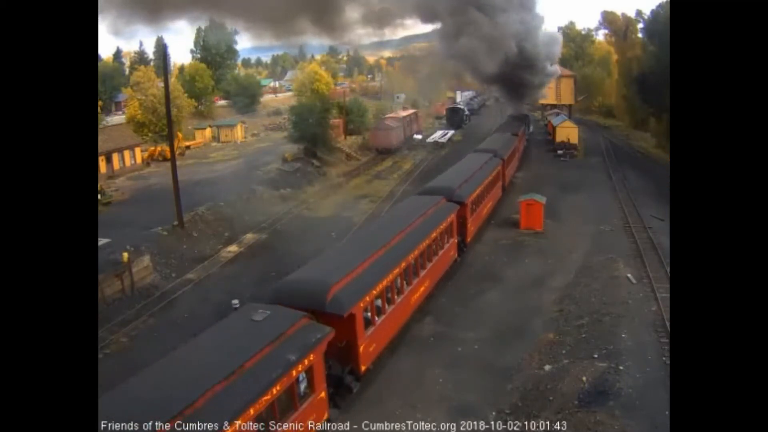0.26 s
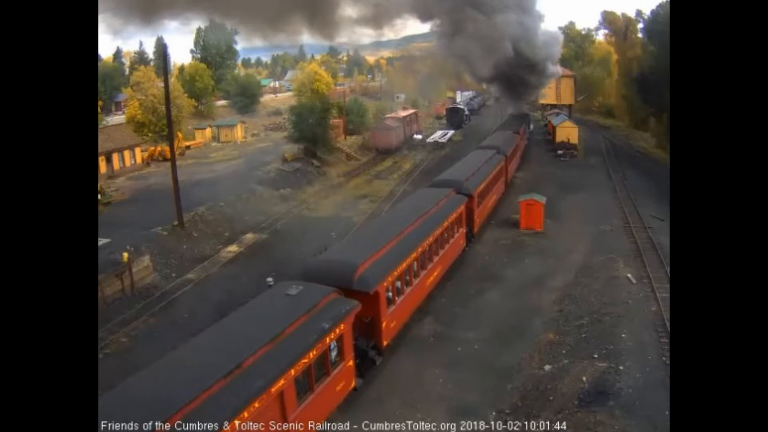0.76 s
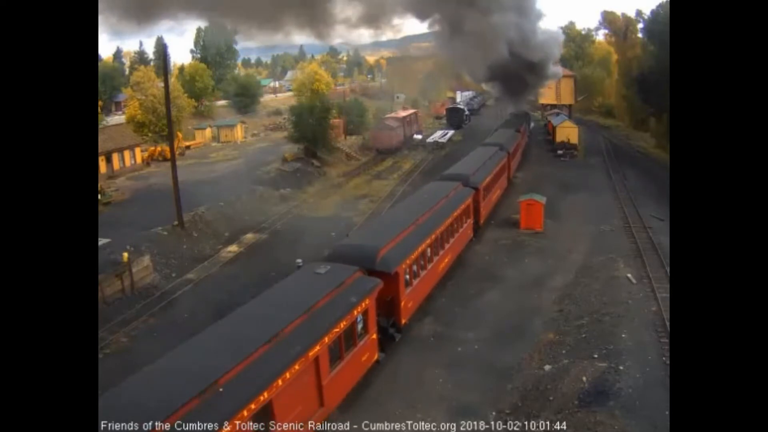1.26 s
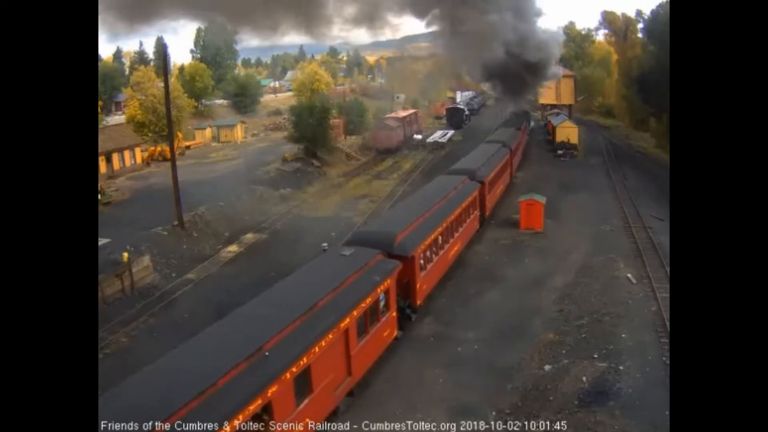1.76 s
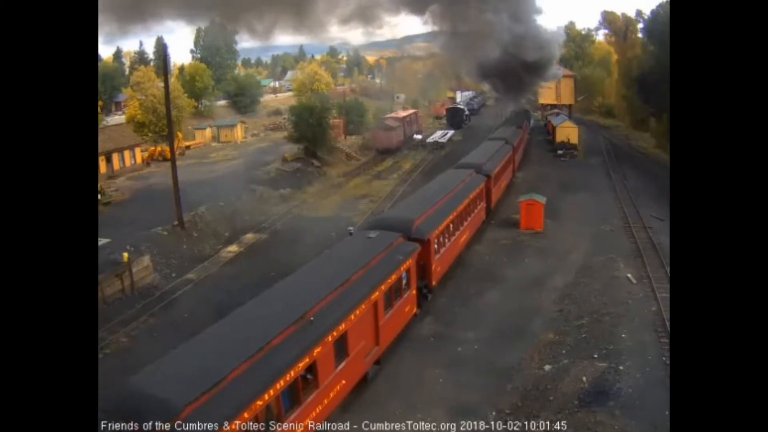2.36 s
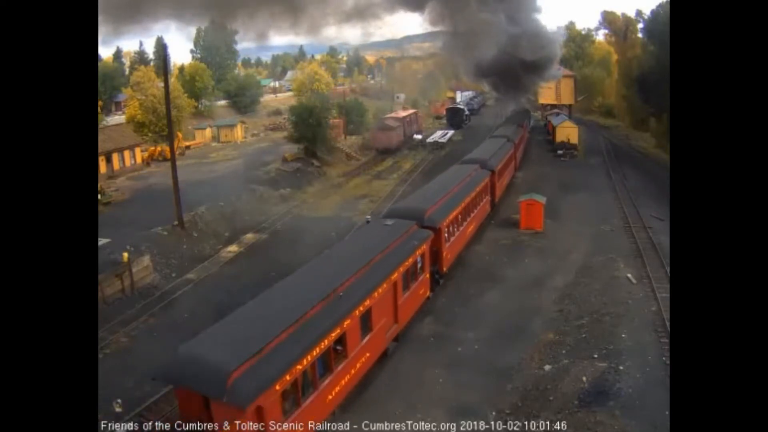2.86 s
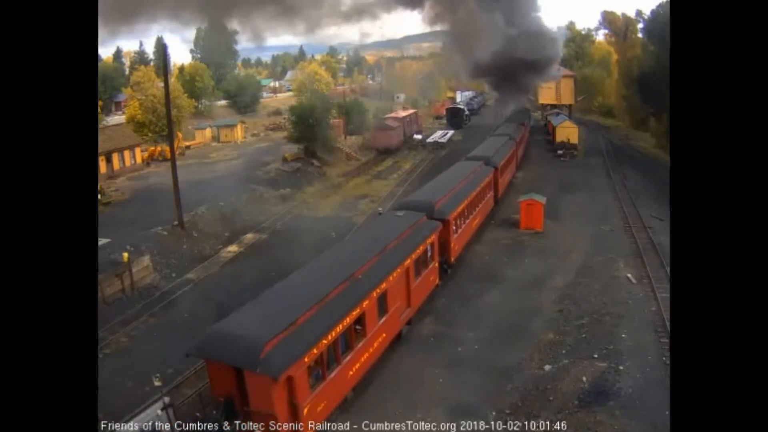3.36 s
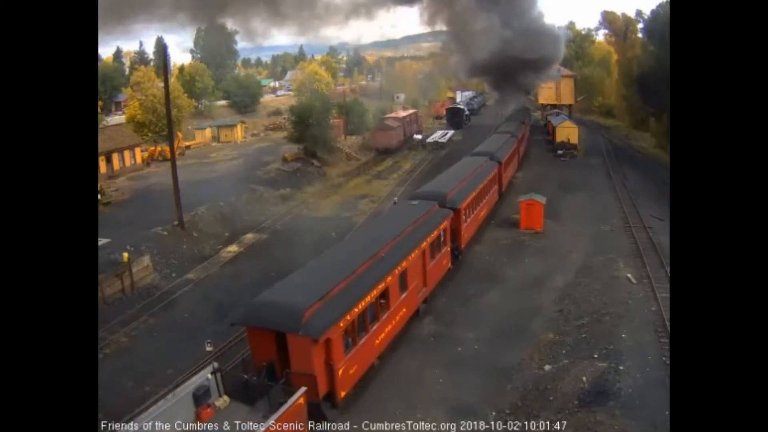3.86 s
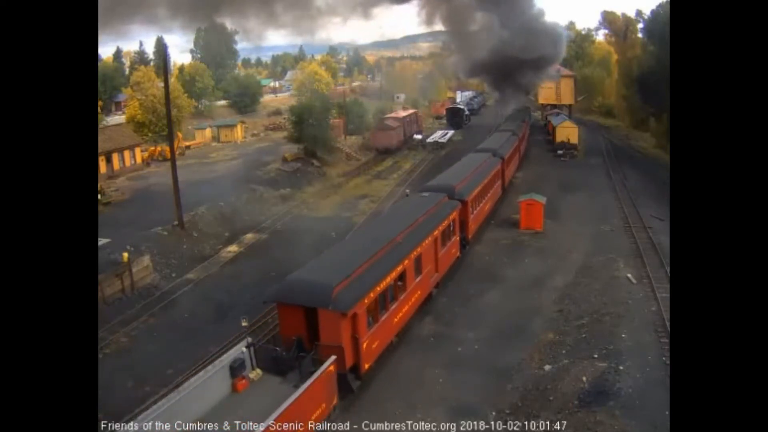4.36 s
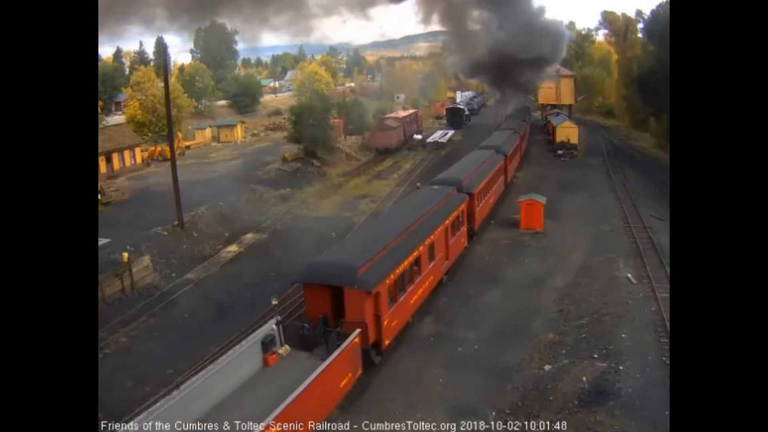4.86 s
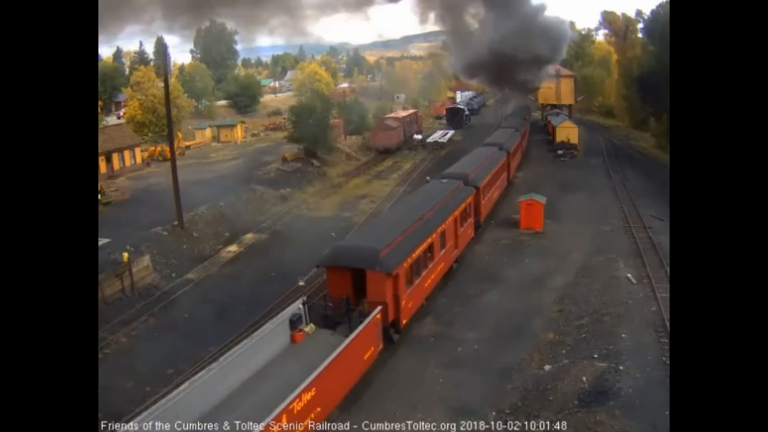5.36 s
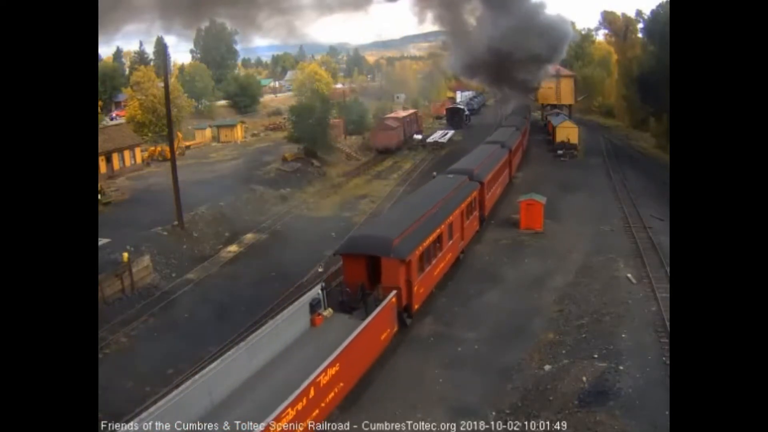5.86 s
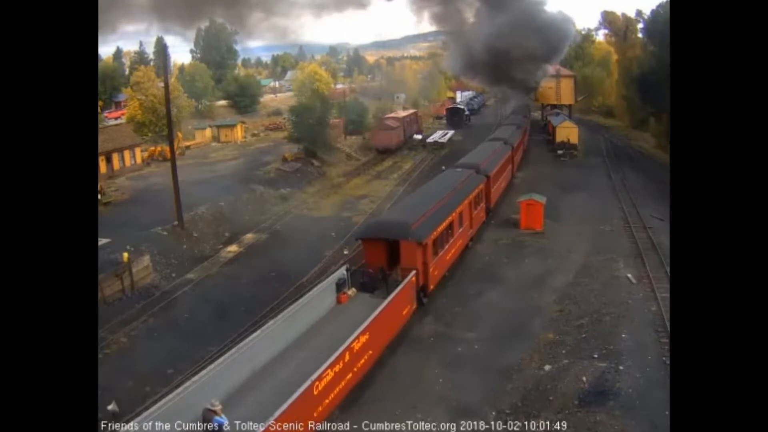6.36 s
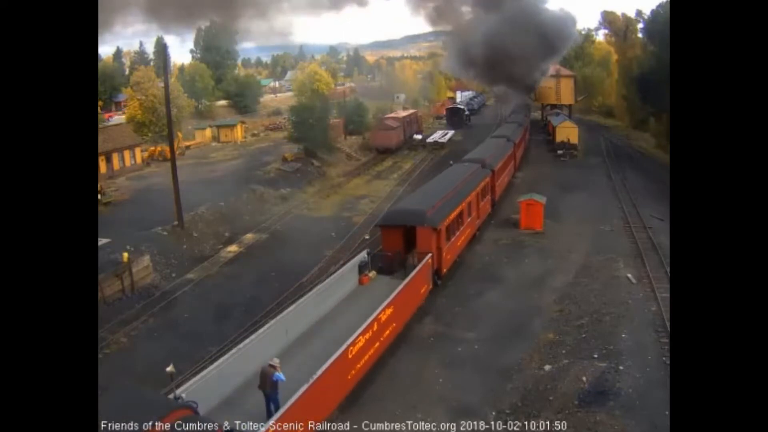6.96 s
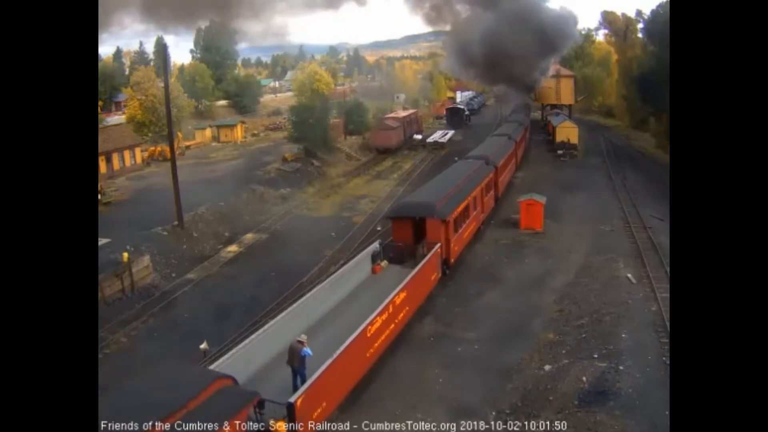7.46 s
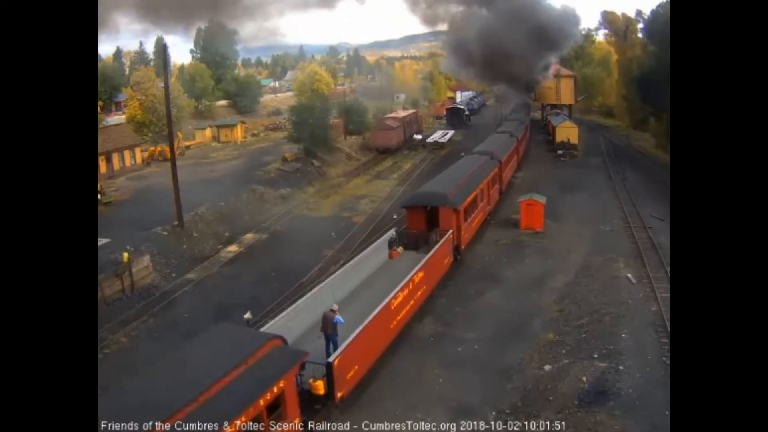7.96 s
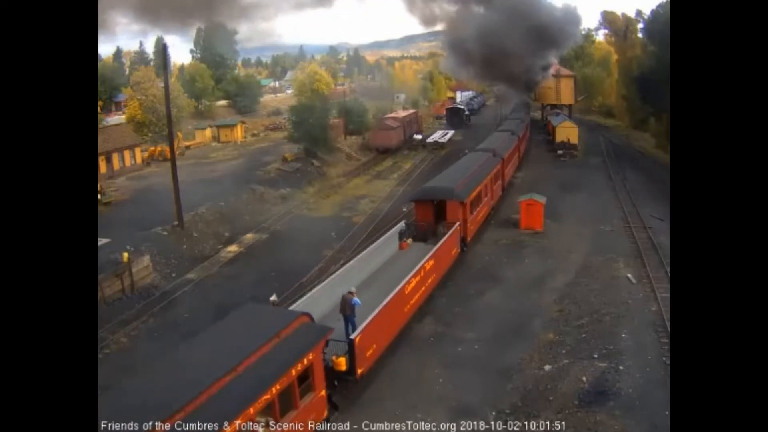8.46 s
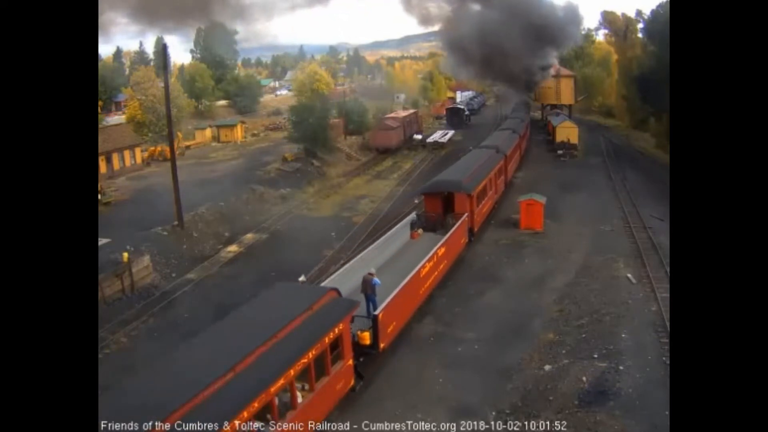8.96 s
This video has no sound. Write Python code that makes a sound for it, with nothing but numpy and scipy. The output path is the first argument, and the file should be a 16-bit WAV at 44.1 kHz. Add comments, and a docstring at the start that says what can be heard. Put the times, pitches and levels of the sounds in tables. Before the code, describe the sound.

A departing steam train toots its rich, airy whistle twice in the distance, and the sound rings away across an open yard. A soft, steady hiss continues close to the microphone beside the track, along with the low-key rolling of passenger coaches and a thin whine. From about halfway, a small metal part ticks rapidly while wheels knock unevenly over rail joints, and the flanges squeak briefly toward the end.

```python
"""A steam locomotive's five-chime whistle, two short blasts from far down a rail yard as the train leaves.
Steam blows five pipes, each sounding mostly odd harmonics in a breathy rush; buildings and wooded
slopes throw the blasts back. Nearer the microphone the coaches roll past, wheels clunking and flanges
squeaking, under a steady hiss, with a quick, light metallic ticking and a faint motor whine."""
import sys
import numpy as np
from scipy import signal
from scipy.fft import rfft, irfft, next_fast_len
from scipy.io import wavfile
from scipy.ndimage import uniform_filter1d, map_coordinates

SR = 44100
rng = np.random.default_rng(int(sys.argv[2]) if len(sys.argv) > 2 else 0)


def master_out(mix):
    """Clip the mix to full scale and print it as 16-bit PCM to the path in sys.argv[1]."""
    frames = np.transpose(np.atleast_2d(mix))
    ceiling = np.clip(frames, -1, 1)
    pcm = np.round(ceiling * 32767).astype(np.int16)
    wavfile.write(sys.argv[1], SR, pcm)


N = 405719
TIME = np.arange(N) / SR


def undb(db):
    """Decibels to gain."""
    return 10 ** (np.asarray(db) / 20)


def curve(rows):
    """Join (time [s], value) points with straight lines."""
    return np.interp(TIME, *np.transpose(rows))


def bump(t, centre_s, half_s):
    """A bell curve of height 1."""
    return np.exp(-((t - centre_s) / half_s) ** 2)


def decay(t, t60_s):
    """A fall of 60 dB every t60_s."""
    return np.exp(-np.log(1000) * t / t60_s)


def walk(rate_hz):
    """Smooth random drift with a spread near 1, changing rate_hz times a second."""
    steps = rng.standard_normal(8192)
    return map_coordinates(steps, [TIME[::32] * rate_hz], order=3, mode="wrap").repeat(32)[:N]


def noise(spectrum):
    """Noise of rms 1, shaped by (frequency [Hz], level [dB]) points and rolled off above them."""
    hz, db = np.transpose(spectrum)
    size = next_fast_len(N, real=True)
    bins = np.maximum(np.fft.rfftfreq(size, 1 / SR), 1)
    gain = undb(np.interp(np.log(bins), np.log(hz), db)) / (1 + (bins / (2 * hz[-1])) ** 4)
    shaped = irfft(rfft(rng.standard_normal(size)) * gain, size)[:N]
    return shaped / np.sqrt(np.mean(shaped ** 2))


def lowpass(x, hz):
    """Gentle first-order low-pass."""
    return signal.sosfilt(signal.butter(1, hz, fs=SR, output="sos"), x)


def phase_of(hz):
    """Running phase of a moving frequency."""
    return 2 * np.pi * np.cumsum(hz) / SR


# Low rumble all over the yard: (frequency [Hz], relative level [dB])
RUMBLE_SPECTRUM = [(15, -14), (28, -4), (42, 5), (52, -1), (68, -1.5), (85, -12), (102, -17), (120, -6.5),
                   (175, -2.5), (280, -2), (400, -6), (700, -17.5), (1500, -42.5)]
def yard_rumble(level_db=-68, drift_db=0.52):
    """The yard's low rumble drifts slowly in level behind everything else."""
    return noise(RUMBLE_SPECTRUM) * undb(level_db + drift_db * walk(2.5))


# Motor whine, faint at the microphone: (frequency [Hz], rms level [dB])
WHINE_LINES = [(2445, -64), (2472, -68), (4195.5, -79), (4253, -82.5), (4312.5, -79), (5098, -94)]
def motor_whine(flutter_db=3.0):
    """A small motor sings thin, fluttering lines that waver together with its speed."""
    speed = 1 + .0005 * walk(20)
    return sum(np.sqrt(2) * undb(db + flutter_db * walk(14)) * np.sin(phase_of(hz * speed))
               for hz, db in WHINE_LINES)


# Steam hissing nearby: (frequency [Hz], relative level [dB])
HISS_SPECTRUM = [(1200, -29), (2000, -11), (2300, -5.5), (2450, -1.5), (2650, -1.5), (2800, -3), (3200, -5),
                 (3380, -4), (3800, -11), (4100, -18.5), (4450, -25), (4850, -29), (5250, -34.5),
                 (7000, -42.5)]
# Its slow rise and fall: (time [s], level before gain_db [dB])
HISS_CONTOUR = [(0, -52), (1.3, -50), (3.5, -52.5), (6.4, -51.5), (8.7, -50), (9.2, -52.5)]
# Its brief surges: (time [s], half length [s], rise [dB])
HISS_SURGES = [(2.45, 0.056, 4), (2.99, 0.11, 2.5), (5.14, 0.14, 3), (8.358, 0.1, 2.5)]
def steam_hiss(gain_db=-1, flicker_db=1.34):
    """Steam hisses steadily, flickering a little and surging now and then."""
    surge_db = sum(db * bump(TIME, s, half_s) for s, half_s, db in HISS_SURGES)
    return noise(HISS_SPECTRUM) * undb(curve(HISS_CONTOUR) + gain_db + surge_db + flicker_db * walk(70))


# Coaches rolling on the near track: (frequency [Hz], relative level [dB])
ROLL_SPECTRUM = [(300, -26), (450, -8), (580, -13), (740, -3.5), (850, -7), (950, -3.5), (1500, -0.5),
                 (1900, -3), (2600, -5.5), (4000, -37)]
# Their passage by the microphone: (time [s], level [dB])
ROLL_CONTOUR = [(0, -58.5), (2.5, -57), (3.5, -61), (6.1, -60.5), (7.2, -59), (9.2, -59.5)]
# Wheels grinding on the rails: (time [s], half length [s], rise [dB])
WHEEL_GRINDS = [(3.84, 0.1, 1.5), (5.15, .12, 1.5), (7.96, 0.06, 3)]
def rolling_coaches(uneven_db=0.5, flicker_db=1.0):
    """Wheels roll slowly and unevenly on the rails, grinding now and then."""
    grind_db = sum(db * bump(TIME, s, half_s) for s, half_s, db in WHEEL_GRINDS)
    wheels = noise(ROLL_SPECTRUM)
    return wheels * undb(curve(ROLL_CONTOUR) + grind_db + uneven_db * walk(8.9) + flicker_db * walk(30))


# Knocks from under the passing coaches: (time [s], level [dB])
CLUNK_HITS = [(2.905, -59), (3.775, -57), (3.908, -62), (4.238, -51), (5.032, -56.5), (5.198, -54.5),
              (5.456, -53), (5.645, -53.5), (7.103, -58), (7.572, -57.5), (7.635, -67), (7.897, -51),
              (7.972, -52), (8.342, -55), (9.16, -55)]
# What a knock rings with: (frequency [Hz], relative level [dB])
CLUNK_SPECTRUM = [(400, -26.5), (650, -12.5), (780, -5.5), (940, -0.5), (1200, -6), (1510, -2.5),
                  (2050, 1.5), (2600, -9.5), (4000, -33)]
def wheel_clunks(attack_s=0.0096, t60_s=.2):
    """Wheels drop over rail joints and the running gear knocks: short, dull clatters."""
    force = np.zeros(N)
    for s, db in CLUNK_HITS:
        since = np.maximum(TIME - s, 0)
        rise = 1 - np.exp(-since / attack_s)
        force += undb(db) * rise * decay(np.maximum(since - 2 * attack_s, 0), t60_s)
    return noise(CLUNK_SPECTRUM) * force


# Squeaks from the near track: (time [s], half length [s], frequency [Hz], rms level at the peak [dB])
FLANGE_SQUEAKS = [(6.817, 0.018, 1940, -58), (7.59, 0.055, 5000, -81), (8.048, .03, 3900, -66),
                  (8.14, 0.028, 5100, -81), (8.341, 0.013, 6220, -78), (8.344, .03, 3980, -64),
                  (8.585, 0.058, 1820, -59), (8.69, .055, 1827, -64), (8.774, .03, 3930, -62.5)]
def flange_squeaks(waver=0.003, stutter_db=2):
    """A wheel rings faintly and brokenly where its flange rubs the rail."""
    grip = undb(stutter_db * walk(60))
    squeaks = np.zeros(N)
    for s, half_s, hz, db in FLANGE_SQUEAKS:
        tone = np.sqrt(2) * np.sin(phase_of(hz * (1 + waver * walk(90))))
        squeaks += undb(db) * bump(TIME, s, half_s) * tone
    return grip * squeaks


# Speed of the ticking mechanism: (time [s], rate [turns/s])
TURN_RATE = [(4.4, 8.28), (5.24, 9.39), (6.15, 8.86), (6.48, 7.97), (7.65, 8.62), (8.63, 8.7), (9.2, 8.33)]
# Its light strokes as it nears the microphone: (time [s], attack level [dB])
STROKE_CONTOUR = [(0, -56.5), (3.8, -58.5), (4.4, -52), (6.2, -49), (9.2, -51.5)]
def light_strokes(on_beat_s=4.417, back_db=-3):
    """A stroke on each turn and a weaker one half a turn later, as (time [s], level [dB])."""
    turns = np.cumsum(curve(TURN_RATE)) / SR
    turns -= np.interp(on_beat_s, TIME, turns)
    half_turns = np.arange(np.ceil(2 * turns[0]), 2 * turns[-1])
    times = np.interp(half_turns / 2, turns, TIME)
    levels = np.interp(times, TIME, curve(STROKE_CONTOUR)) + back_db * (half_turns % 2)
    return zip(times, levels)


# The metal's ring: (frequency [Hz], relative level approaching [dB], relative level near [dB], t60 [s])
METAL_MODES = [(1636, -8.5, -3, 0.048), (2448, 8, 4, .034), (2624, 8.5, 5.5, 0.03), (2930, -1, 4, 0.028),
               (3130, -4.5, -1.5, 0.03), (3344, -2.5, 6, 0.034), (3487, 2, -0.5, 0.026),
               (4003, -1.5, -6, 0.033), (4210, -6.5, -7, 0.03), (4740, -15.5, -11.5, 0.03),
               (6210, -8.5, -6.5, 0.038)]
# Hard taps on it, heard from the trackside: (time [s], attack level [dB])
HARD_TAPS = [(.281, -51), (2.635, -52), (2.998, -47), (4.012, -44.5), (4.415, -46.5), (4.655, -43.5),
             (4.879, -47.5), (4.991, -47), (5.041, -46), (5.102, -50), (5.317, -46), (5.425, -46.5),
             (5.533, -47.5), (5.751, -47), (5.860, -44), (5.971, -49), (6.084, -47.5), (6.197, -45.5),
             (6.313, -46), (6.434, -44.5), (6.929, -47), (6.983, -46), (7.097, -48), (7.170, -47.5),
             (7.231, -47.5), (7.288, -50), (7.407, -47), (7.524, -48.5), (7.640, -45), (7.757, -44.5),
             (7.873, -47), (7.989, -43.5), (8.103, -48.5), (8.218, -43.5), (8.279, -46.5), (8.340, -46.5),
             (8.449, -45.5), (8.681, -46), (8.797, -41.5), (8.913, -44.5), (9.088, -50.5), (9.151, -46.5)]
def metal_ticking(rattle_s=0.001295, band_hz=(1600, 4100), bright_db=3, bright_hz=3800,
                  nearing_s=(6.2, 6.8)):
    """A small metal part is tapped in a quick beat; its middle modes come forward as it nears."""
    t = TIME[:SR // 10]
    # neighbouring modes swing in opposite directions
    modes = [(-1) ** k * decay(t, t60) * np.sin(2 * np.pi * hz * t)
             for k, (hz, _, _, t60) in enumerate(METAL_MODES)]
    # a small part radiates no bass, and a blunt contact puts little into the high treble
    modes = signal.sosfilt(signal.butter(4, band_hz, "band", fs=SR, output="sos"), modes)
    hard = [(s, db, 0) for s, db in HARD_TAPS]
    # between the hard taps, light strokes only graze the metal and favour its high modes
    light = [(s, db, bright_db) for s, db in light_strokes()
             if all(abs(s - hard_s) > .03 for hard_s, _ in HARD_TAPS)]
    ticks = np.zeros(N + SR)
    for s, db, lift_db in hard + light:
        mode_db = [np.interp(s, nearing_s, (far_db, near_db)) + lift_db * (hz > bright_hz)
                   for hz, far_db, near_db, _ in METAL_MODES]
        # each contact is a short chatter that swells and dies away
        contact = rng.standard_normal(len(t)) * t * np.exp(-t / rattle_s)
        tap = signal.fftconvolve(contact, undb(mode_db) @ modes)[:len(t)]
        attack_rms = np.std(tap[t < .006])
        start = max(int((s - rattle_s) * SR), 0)
        ticks[start:start + len(t)] += undb(db) * tap / attack_rms
    return ticks[:N]


def moving_air(x, wander_s=.00014):
    """Moving air keeps changing a long path's length: high partials blur while low ones stay clear."""
    lag = wander_s * uniform_filter1d(walk(48), size=64)
    return map_coordinates(x, [(TIME - lag) * SR], order=3, mode="nearest")


# Echoes off the buildings round the yard: (delay [s], level before air and ground losses [dB])
BUILDING_ECHOES = [(0.089, -4), (.21, -6), (.42, -14.5), (.73, -24)]
def yard_echoes(x, trees_db=-6, trees_t60_s=2.4, smear_s=0.05, air_hz=5500, ground_hz=230,
                valley_db=-6.5, valley_t60_s=3.6, valley_hz=700, valley_width_hz=300):
    """Scatter from the trees, smeared echoes off buildings and a long, dull tail from the valley."""
    t = TIME[:3 * SR]
    scatter = decay(t, trees_t60_s) * (1 - np.exp(-t / 0.021))
    power = undb(2 * trees_db) * scatter ** 2 / np.sum(scatter ** 2)
    for delay_s, db in BUILDING_ECHOES:
        echo = bump(t, delay_s, smear_s)
        power += undb(2 * db) * echo / echo.sum()
    near = lowpass(np.sqrt(power) * rng.standard_normal(len(t)), air_hz)
    tail = decay(t, valley_t60_s) * (1 - np.exp(-t / 0.27))
    # ground takes the lows and air the highs, so a middle band carries farthest
    carry = signal.iirpeak(valley_hz, valley_hz / valley_width_hz, fs=SR)
    far = signal.lfilter(*carry, tail / np.linalg.norm(tail) * rng.standard_normal(len(t)))
    response = near + undb(valley_db) * far
    # soft ground weakens the lowest chimes on the long paths
    response -= lowpass(response, ground_hz)
    return signal.fftconvolve(moving_air(x), response)[:N]


# Blasts far down the yard: (valve opens [s], valve shuts [s], final blowing level [dB], tuning [ratio])
WHISTLE_BLASTS = [(.525, .772, -34, .987), (1.455, 1.767, -31, 1.002)]
def steam_valve(attack_s=0.037, swell_db_per_s=9.5, release_s=0.0473, settle_s=.06, sag_s=0.03584):
    """Pressure builds, creeps up while the valve is open and drains away once it shuts."""
    levels, tunings = [], []
    slack = 1  # 1 idle, 0 settled: the pipes take a moment to come up to pitch, and sag at the end
    for opens, shuts, db, tuning in WHISTLE_BLASTS:
        since_open, since_shut = np.maximum(TIME - opens, 0), np.maximum(TIME - shuts, 0)
        pressure = (1 - np.exp(-since_open / attack_s)) * np.exp(-since_shut / release_s)
        swell_db = swell_db_per_s * np.minimum(TIME - shuts, 0)
        levels.append(db + 20 * np.log10(pressure + 1e-4) + swell_db)
        tunings.append(tuning)
        slack -= (1 - bump(since_open, 0, settle_s)) * np.exp(-since_shut / sag_s)
    return np.max(levels, axis=0), np.choose(np.argmax(levels, axis=0), tunings), slack


# Steam at the distant whistle's mouth: (frequency [Hz], relative level [dB])
RUSH_SPECTRUM = [(250, -46), (350, -20), (620, -15), (745, -11.5), (850, -29.5), (1030, -12), (1112, -4.5),
                 (1160, -16), (1370, -4.5), (1490, -10.5), (1690, -8.5), (1900, -12), (2370, -1.5),
                 (3050, -4), (3650, -8.5), (4200, -21.5), (5000, -32), (7000, -47.5)]
def steam_rush(blow_db, slack, gain_db=-3.0, slack_db=-6, flicker_db=1.5):
    """Steam rushes past the lips, coloured by the pipes and weaker until they settle."""
    return noise(RUSH_SPECTRUM) * undb(blow_db + gain_db + slack_db * slack + flicker_db * walk(40))


# The five pipes, heard across the yard: (pitch [Hz], share of the tuning followed [ratio],
# flatness when idle [ratio], extra loss below full pressure [dB/dB],
# further loss per harmonic step [dB/dB], then relative levels of harmonics 1 to 6 [dB])
WHISTLE_PIPES = [(365.3, .8, .025, .4, .05, -4, -28.5, -18.5, -29, -11.5, -8.5),
                 (439.3, .15, .025, 0.01, 0.43, -7, -21.5, 0, -19.5, -0.5, -5),
                 (547.7, .5, .06, 0, 0.087, -6.5, -11.5, 1.5, -4, -7, -10.5),
                 (599.2, 1, .015, .1, .05, -6.5, -18.5, -0.5, -3, -2.5, -12.5),
                 (701, 2.0, .02, 1.4, .05, -1, -6, -12, -8, -15, -27.5)]
def whistle_chord(blow_db, tuning, slack, gain_db=-10, breath_db=-15.0, waver=0.00402, ragged=0.01407):
    """Five pipes scoop up to pitch and brighten as the pressure builds; turbulence roughens them."""
    force = undb(blow_db - blow_db.max())
    chord = np.zeros(N)
    for hz, follow, scoop, reluctance, overblow, *levels in WHISTLE_PIPES:
        # the pitch wavers, and turns ragged while the valve opens and shuts
        unsteady = 1 + waver * walk(22) + (.0035 + ragged * slack) * walk(160)
        phase = phase_of(hz * tuning ** follow * (1 - scoop * slack) * unsteady)
        for k, db in enumerate(levels):
            # the jet's turbulence spreads a noisy skirt around each line
            flutter = 1 + undb(breath_db) * walk(60 * np.sqrt(k + 1))
            chord += undb(db) * force ** (reluctance + overblow * k) * flutter * np.sin((k + 1) * phase)
    return undb(blow_db + gain_db) * chord


def scene(chord_echo_db=-2.5):
    """One microphone at the trackside: the whistle far across the yard, the coaches nearer by."""
    blow_db, tuning, slack = steam_valve()
    chord = whistle_chord(blow_db, tuning, slack)
    rush = steam_rush(blow_db, slack)
    # the echoes are breathier than the blast: they carry less of the chord than of the rush
    echoes = yard_echoes(undb(chord_echo_db) * chord + rush)
    bed = steam_hiss() + rolling_coaches() + yard_rumble()
    running_gear = wheel_clunks() + flange_squeaks() + metal_ticking() + motor_whine()
    return (chord + rush + echoes + bed + running_gear)[None]


def record(dry, top_hz=6950):
    """The microphone passes nothing above the middle treble."""
    return signal.sosfilt(signal.ellip(8, .2, 70, top_hz, fs=SR, output="sos"), dry)


dry = scene()
out = record(dry)
master_out(out)
```